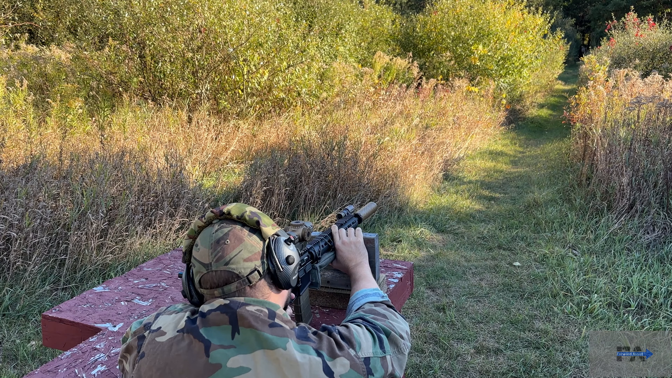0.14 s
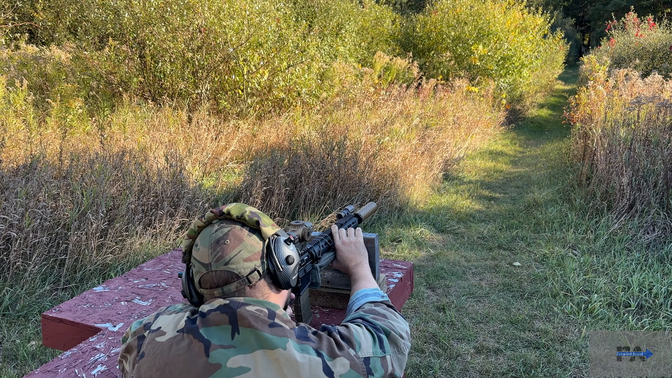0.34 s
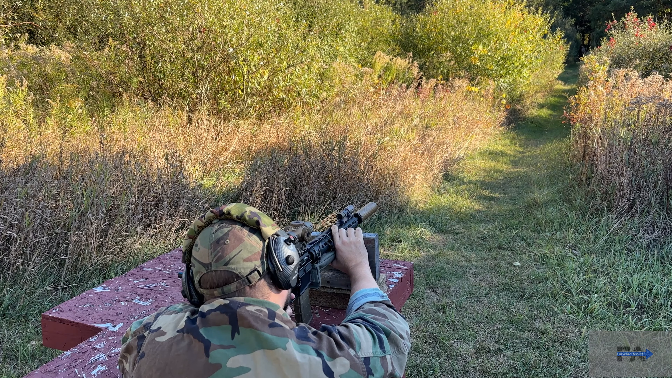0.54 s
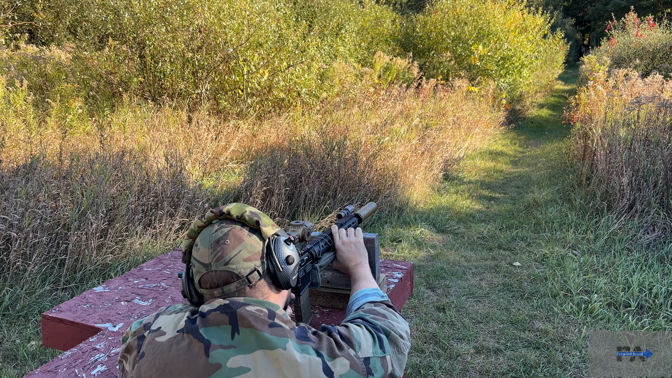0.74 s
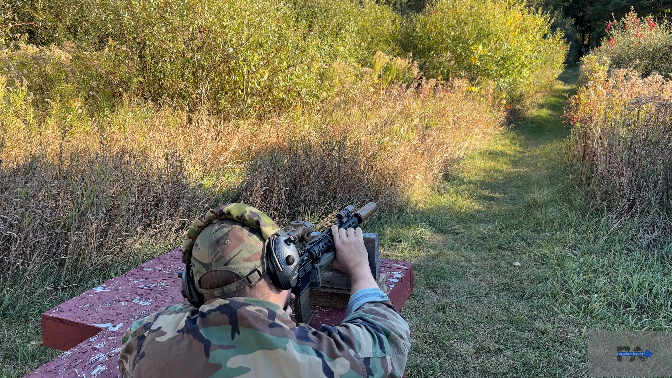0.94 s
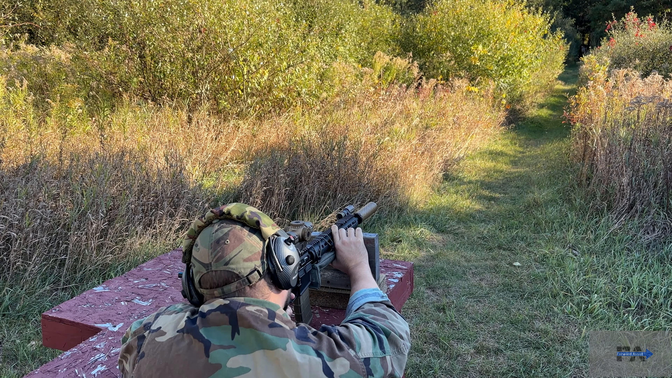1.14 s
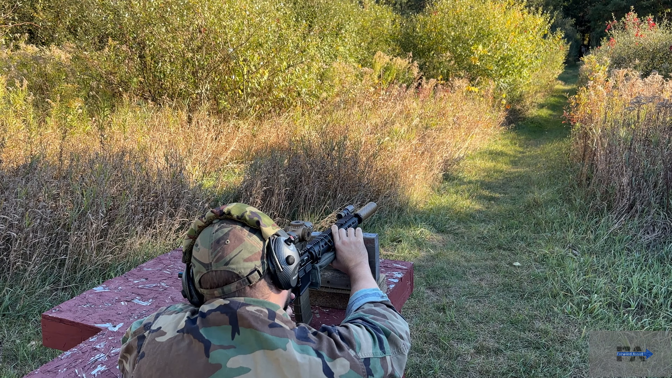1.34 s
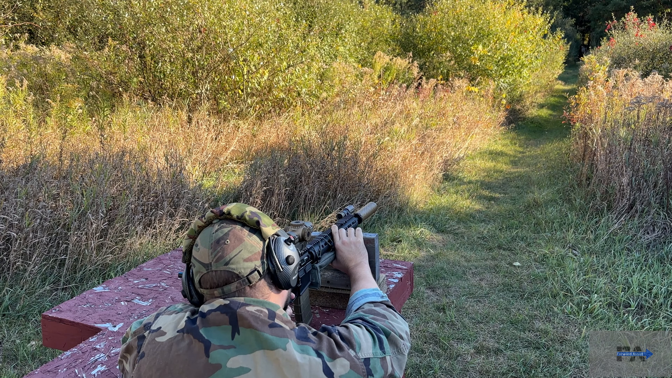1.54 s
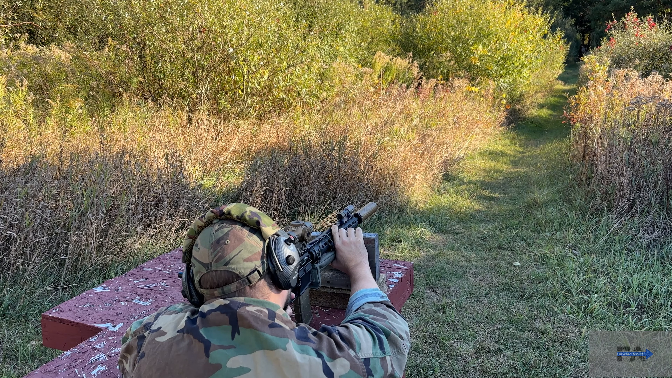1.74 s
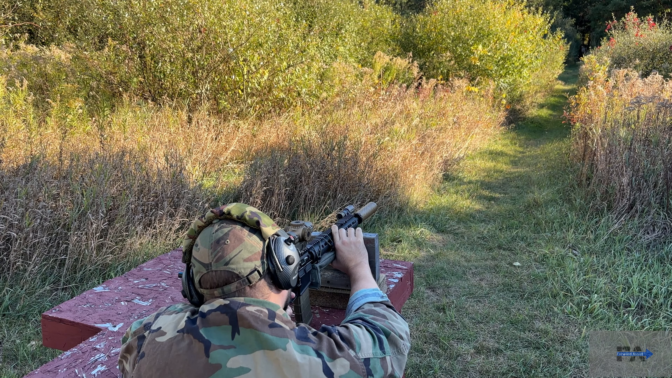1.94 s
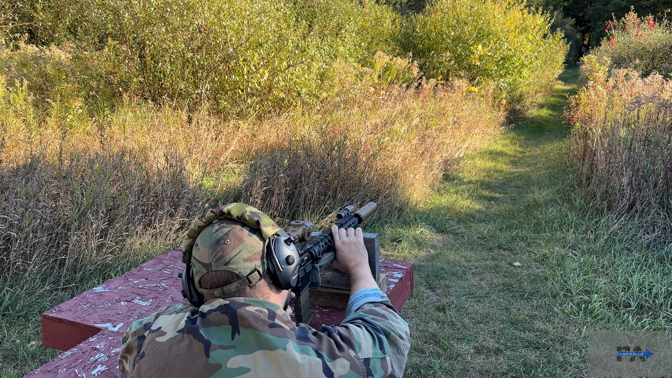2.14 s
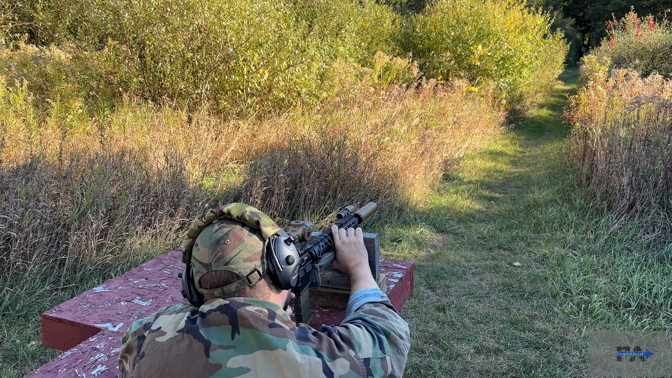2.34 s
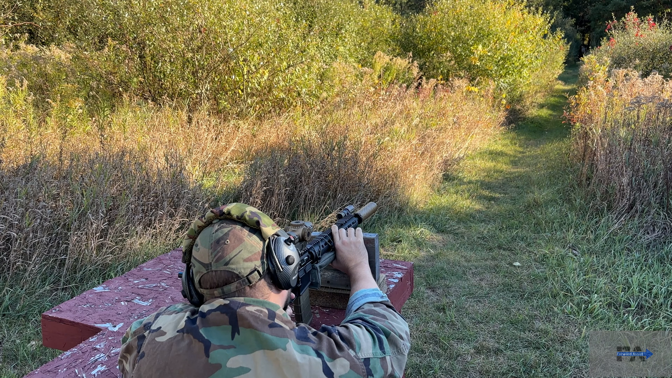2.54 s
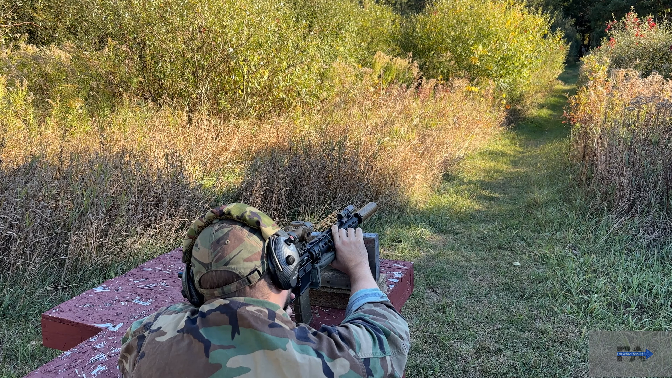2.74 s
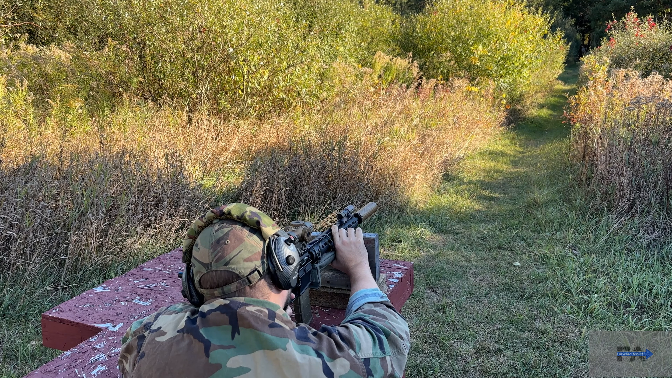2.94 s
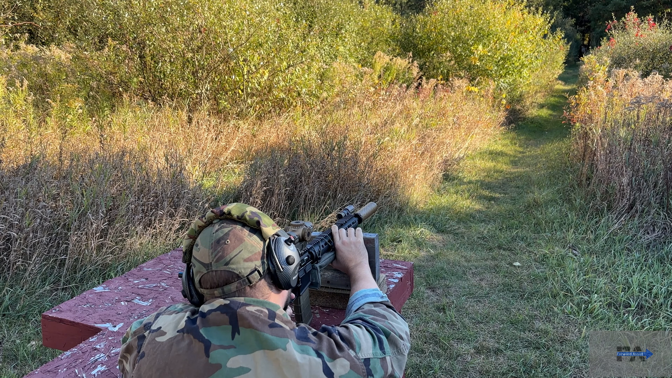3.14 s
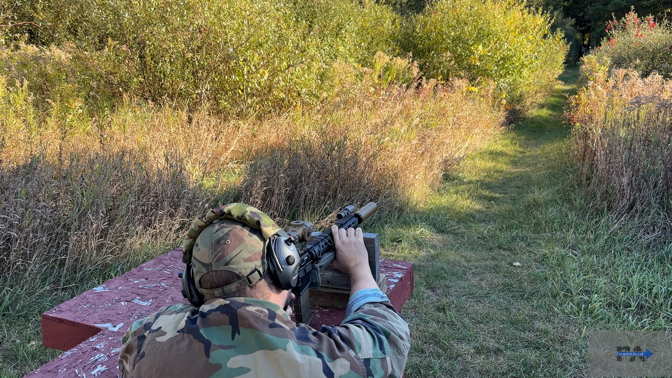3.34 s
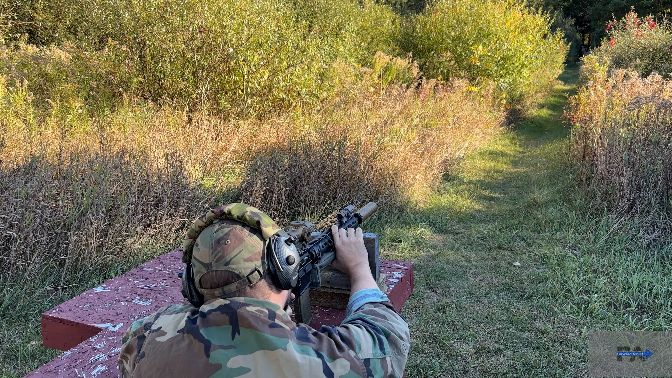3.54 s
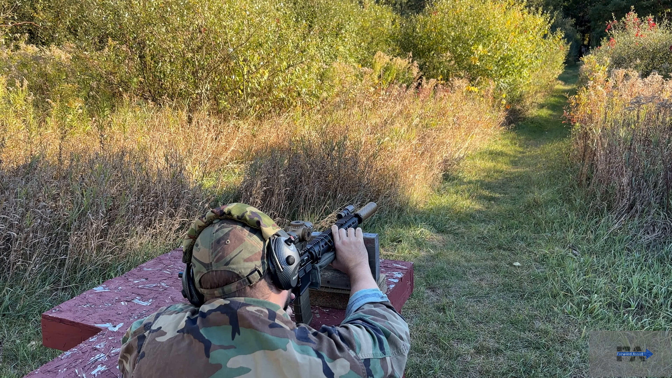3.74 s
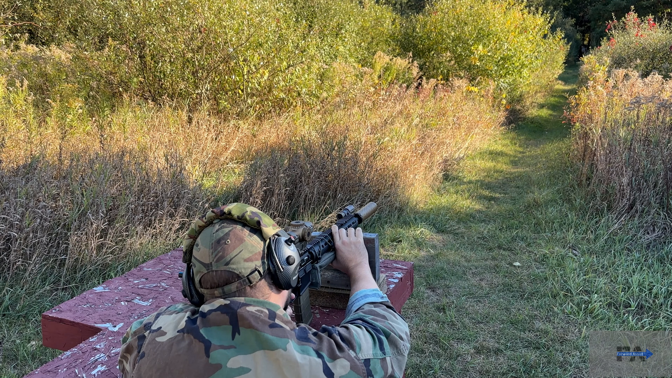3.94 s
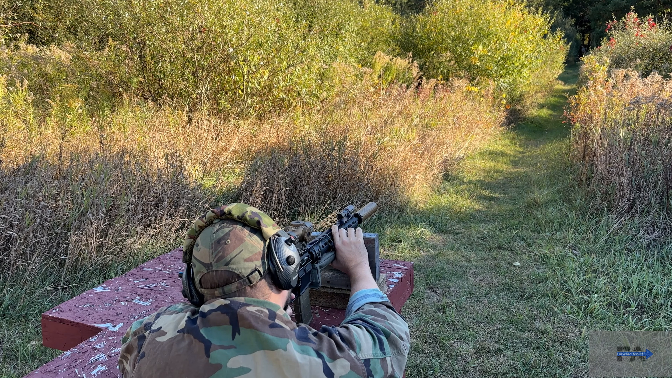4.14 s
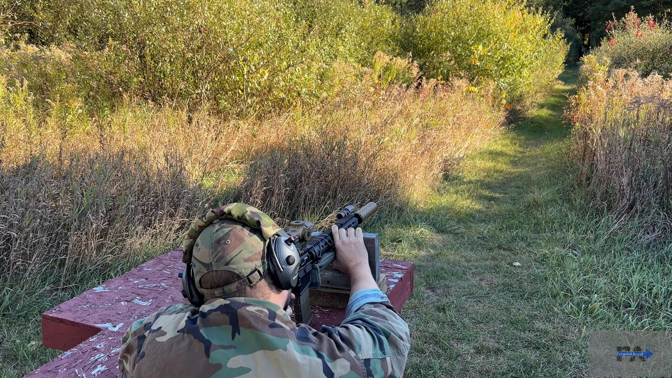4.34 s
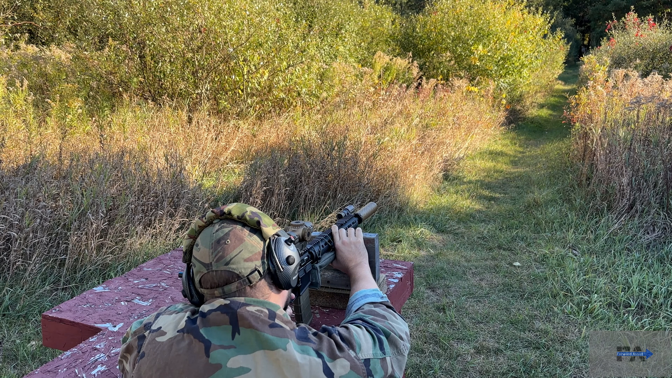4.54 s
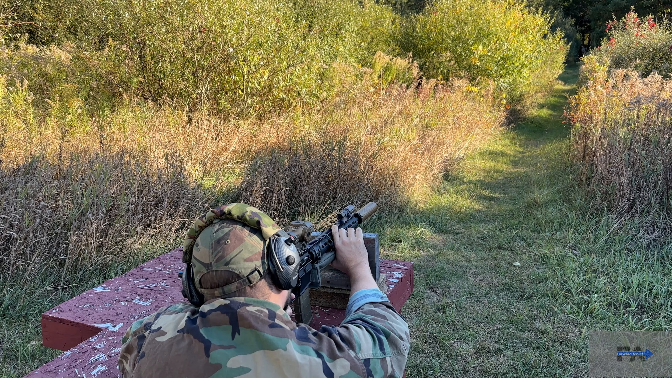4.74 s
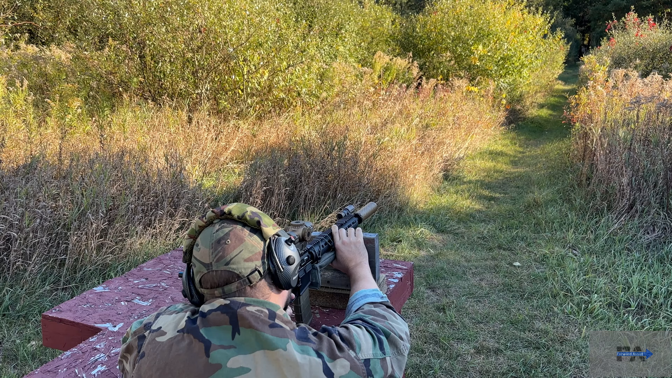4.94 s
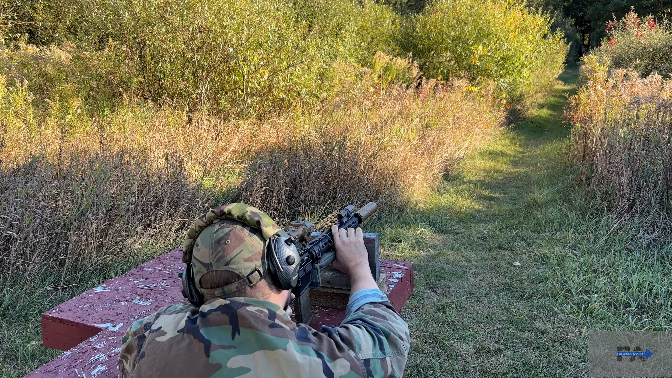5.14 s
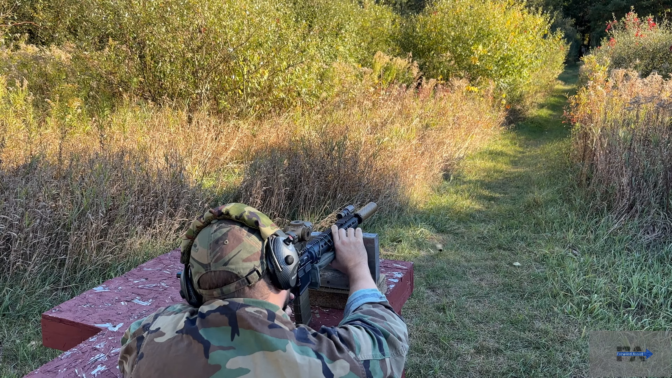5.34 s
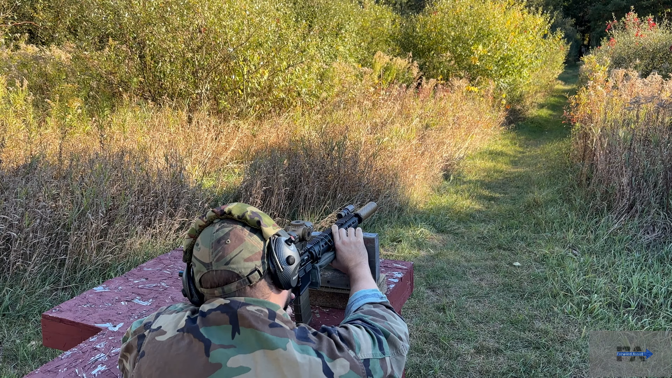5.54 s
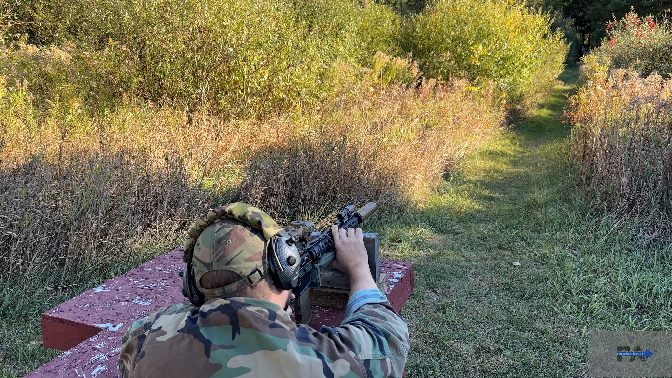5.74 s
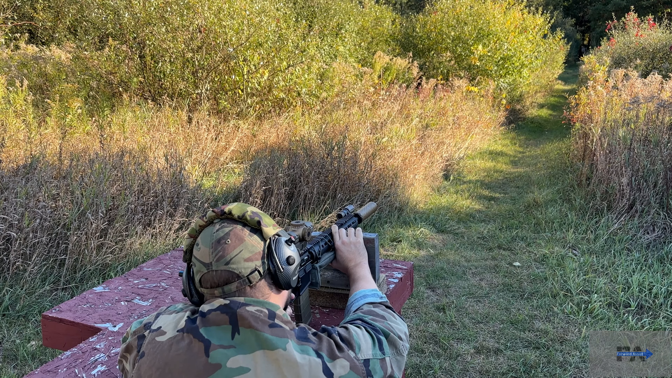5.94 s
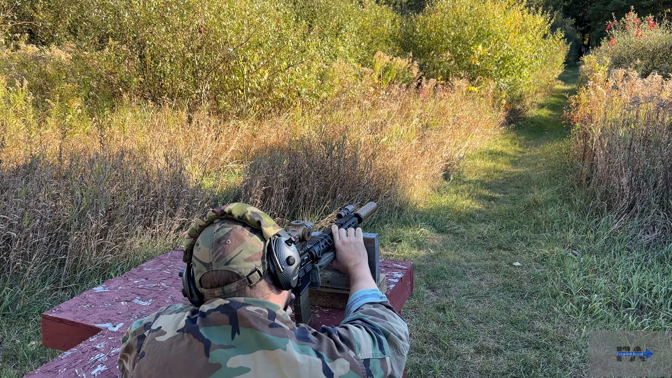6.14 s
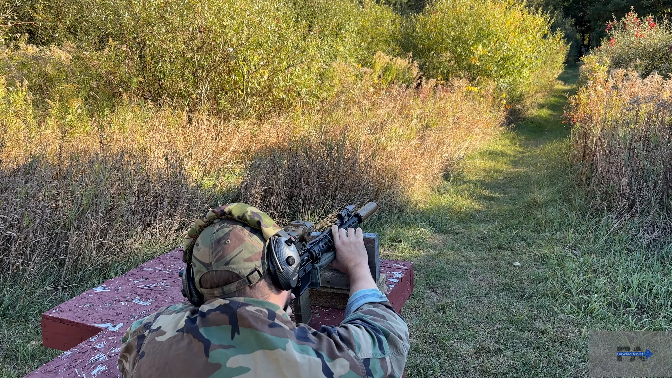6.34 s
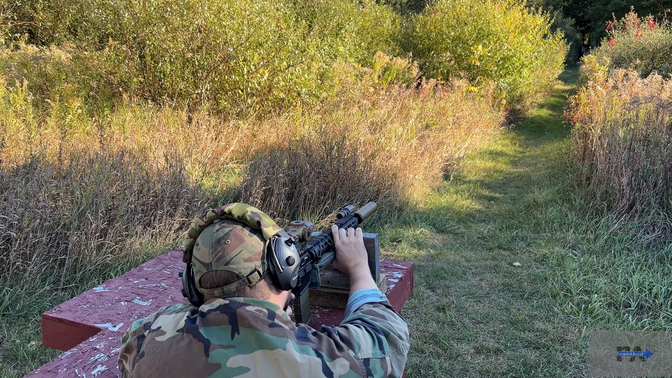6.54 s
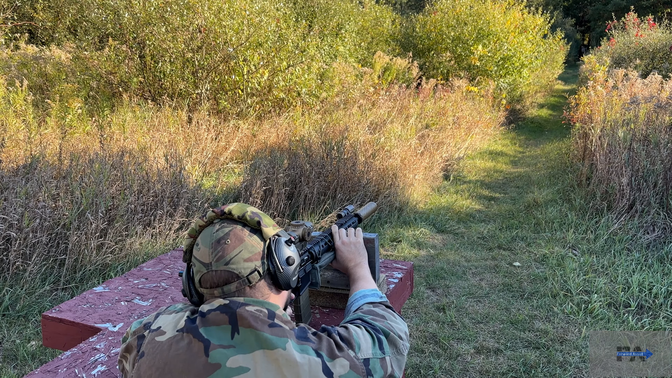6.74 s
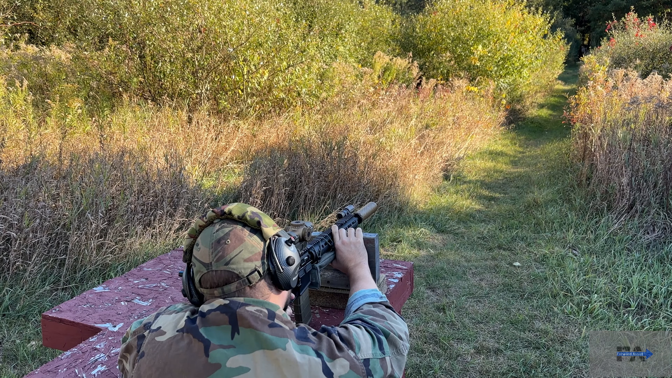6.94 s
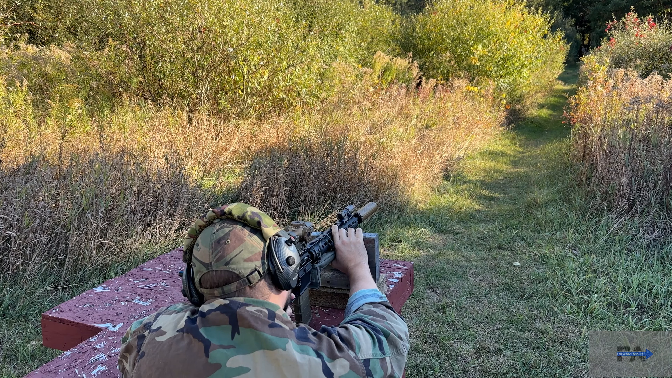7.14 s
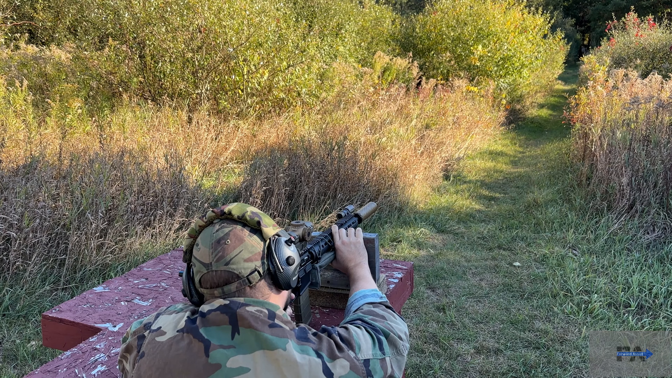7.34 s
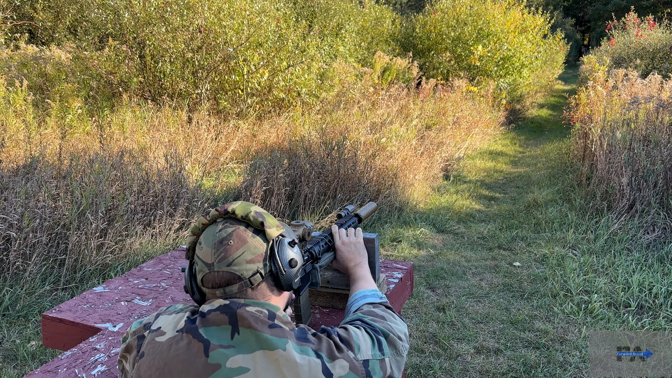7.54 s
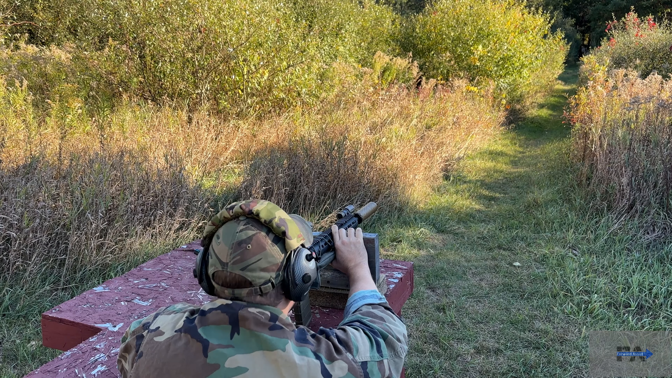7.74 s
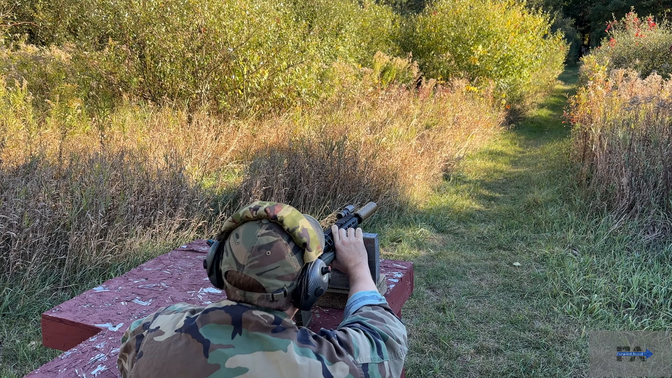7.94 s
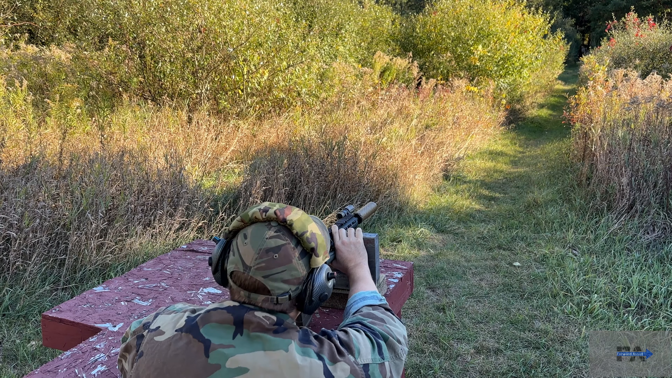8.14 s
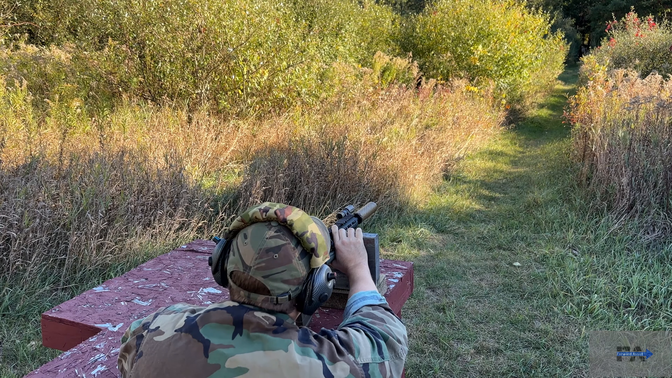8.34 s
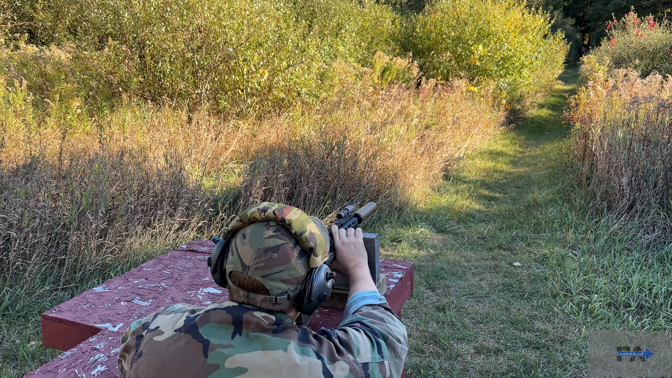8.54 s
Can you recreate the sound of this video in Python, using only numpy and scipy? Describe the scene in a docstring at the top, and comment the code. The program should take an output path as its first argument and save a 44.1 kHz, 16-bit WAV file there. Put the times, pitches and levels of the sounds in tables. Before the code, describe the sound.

The sound opens on the echo of an earlier rifle shot, dying away over about two seconds. Light wind bumps the microphone in low gusts, strongest between 2.7 and 3.8 seconds, over a faint countryside hum. Sparrows chirp far off now and then. At 1.8 seconds the rifle's steel action clicks softly, with a few tiny ticks around it. At about 5.3 seconds the suppressed rifle fires once, close by and much louder than anything else: a sharp crack with a low recoil thump on the bench. The crack scatters back from bushes and trees, swells briefly, then dulls and fades over two seconds. At 5.8 seconds a spent brass case lands with a short, bright ping. The wind eases, a faint metal click comes at 7.9 seconds, and a sleeve rustles very softly at the end.

```python
"""The echo of a rifle shot dies away in a scrubby lane while light wind buffets the microphone.
The steel action clicks and the suppressed rifle fires again: gas rings in the suppressor, the bullet
cracks, recoil thumps the bench. The crack rolls back from bushes and trees for two seconds and a
spent brass case lands, ringing. A sleeve rustles; sparrows chirp far off over the countryside's hum."""
import sys
import numpy as np
from scipy import signal
from scipy.fft import rfft, irfft, next_fast_len
from scipy.io import wavfile
from scipy.ndimage import uniform_filter1d, map_coordinates

SR = 44100
rng = np.random.default_rng(int(sys.argv[2]) if len(sys.argv) > 2 else 0)


def unload_audio(sound):
    """Save the sound as a 16-bit wav file, at the path given as the first command line argument."""
    columns = np.transpose(np.atleast_2d(sound))
    # keep every value between -1 and 1, then stretch to whole-number steps
    steps = np.round(np.clip(columns, -1, 1) * 32767)
    wavfile.write(sys.argv[1], SR, steps.astype(np.int16))


N = 378378


def amp(db):
    return 10 ** (np.asarray(db) / 20)


def unit_rms(x):
    return x / np.sqrt(np.mean(x ** 2) + 1e-20)


def at_hz(points, hz):
    """Interpolates (Hz, value) points on a log axis."""
    knot_hz, values = np.transpose(points)
    return np.interp(np.log(hz + 1), np.log(knot_hz + 1), values)


def wobble(knots_per_s):
    """Smooth random curve."""
    return map_coordinates(rng.standard_normal(2 ** 13), [np.arange(N) * knots_per_s / SR])


def filtered(x, response):
    """Applies a complex frequency response."""
    size = next_fast_len(x.shape[-1] + 8192)
    return irfft(rfft(x, size) * response(np.fft.rfftfreq(size, 1 / SR)), size)[..., :x.shape[-1]]


def resonances(modes):
    """Frequency response of a body's modes, alternating in sign."""
    return lambda f: sum((-1) ** k * amp(db) * 1j * f * width / (hz * hz - f * f + 1j * f * width)
                         for k, (hz, width, db) in enumerate(modes))


def patchy_noise(spectrum, correlation, patchy_db, shape_db=lambda hz, s: 0):
    """Stereo noise with random patches of gain over frequency and time."""
    def mid_side_response(f):
        angle = np.arccos(np.clip(at_hz(correlation, f), -1, 1)) / 2
        return amp(at_hz(spectrum, f)) * [np.cos(angle), np.sin(angle)]

    hz, s, bins = signal.stft(rng.standard_normal((2, N)), SR, nperseg=256)
    patches = uniform_filter1d(rng.standard_normal(bins.shape[1:]), 4, axis=0)
    patches = unit_rms(uniform_filter1d(patches, 6, axis=1))
    gain = amp(patchy_db * patches + shape_db(hz[:, None], s))
    pair = signal.istft(bins * gain, SR, nperseg=256)[1][:, :N]
    mid, side = filtered(pair, mid_side_response)
    return np.array([mid + side, mid - side]) / np.sqrt(np.mean(amp(at_hz(spectrum, hz)) ** 2))


def add(track, start_s, sound, pan_db=0):
    """Mixes a sound into a stereo track; positive pan is left."""
    part = track[:, round(start_s * SR):][:, :sound.shape[-1]]
    part += sound[..., :part.shape[1]] * amp([[pan_db / 2], [-pan_db / 2]])


def puff(hz, sigma_s, noise_share, phase_rad=0):
    """Gaussian burst of tone and band noise, centred 3 sigma after its start."""
    t = np.arange(-3 * sigma_s, 3 * sigma_s, 1 / SR)
    band = np.exp(-np.log((np.fft.rfftfreq(2 ** 13, 1 / SR) + 1) / hz) ** 2 / 0.32)
    mid, side = unit_rms(irfft(rfft(rng.standard_normal((2, 2 ** 13))) * band))
    hiss = .8 * mid + .5 * side * [[1], [-1]]
    bell = np.exp(-(t / sigma_s) ** 2 / 2) - np.exp(-9 / 2)
    tone = np.cos(2 * np.pi * hz * t + phase_rad * np.array([[-1], [1]]))
    return bell * ((1 - noise_share) * tone + noise_share * .5 * hiss[:, :len(t)])


# Hum envelope. Each row: time in seconds, level in dB.
HUM_LEVEL = [(0, -62), (4.5, -62.5), (6.5, -70.5), (8.58, -72)]
# Hum spectrum. Each row: frequency in Hz, relative density in dB.
HUM_SPECTRUM = [(88, -29.5), (150, -0.5), (190, -6), (275, -5.5), (871, -15), (2400, -33), (7180, -43.5),
                (9820, -52), (13200, -42), (16000, -60)]
# Hum stereo image. Each row: frequency in Hz, left-right correlation.
HUM_CORRELATION = [(60, 0.73), (180, -0.11), (550, 0.19), (1650, -0.28), (4970, 0.42), (15000, -0.21)]


def countryside_hum():
    """Low, wide, slowly wavering noise of the fields."""
    level_db = np.interp(np.arange(N) / SR, *np.transpose(HUM_LEVEL)) + .8 * wobble(3)
    return amp(level_db) * patchy_noise(HUM_SPECTRUM, HUM_CORRELATION, patchy_db=1.5)


# Wind envelope. Each row: time in seconds, level in dB.
WIND_LEVEL = [(0, -35), (.35, -57.5), (1, -58), (2.3, -56.5), (3.1, -53.5), (3.5, -42), (3.82, -40),
              (3.88, -64), (4.25, -50), (4.35, -63), (4.9, -60), (5.2, -43), (5.7, -58.5), (7.2, -64),
              (7.35, -73.5), (8.58, -67.5)]
# Wind rumble. Each row: frequency in Hz, relative density in dB.
WIND_SPECTRUM = [(12, -41.5), (20, -12.5), (54, 10), (123, -1), (206, -16.5), (400, -40), (520, -69),
                 (880, -120)]
# Strong eddies. Each row: centre in seconds, level in dB, pitch in Hz.
EDDIES = [(0.097, -28, 73.5), (0.207, -30, 71), (0.244, -27.5, 101), (0.55, -30.5, 86.3), (.932, -41.5, 83),
          (1.898, -44.5, 73.5), (2.555, -35, 60), (2.707, -24, 85.2), (3.243, -42, 71.7),
          (3.402, -27.5, 76.6), (3.606, -32.5, 79.4), (3.685, -23, 108), (3.754, -27, 67.4),
          (4.091, -41, 95), (4.21, -45, 79), (5.115, -37, 70.2), (5.49, -36, 122), (5.639, -39, 103.5),
          (6.168, -41, 87.4), (6.691, -43.5, 66), (6.948, -30, 73), (7.185, -47.5, 64.3),
          (7.245, -46, 92.4)]


def wind(small_count=40):
    """Wind flutters on the microphone in lumps; eddies thud on its ports."""
    knot_s, wind_db = np.transpose(WIND_LEVEL)
    lumps = amp(np.interp(np.arange(N) / SR, knot_s, wind_db) + 2.9 * wobble(14))
    rumble = filtered(rng.standard_normal((2, N)), lambda f: amp(at_hz(WIND_SPECTRUM, f)))
    mid, side = lumps * unit_rms(rumble)
    out = np.array([mid + 0.67 * side, mid - 0.25 * side])
    when, weakness, pitch = rng.random((small_count, 3)).T
    small_s = when * N / SR
    small_db = np.interp(small_s, knot_s, wind_db) + 9 - 8 * weakness
    small_hz = 76 * 1.25 ** (2 * pitch - 1)
    for s, db, hz in [*EDDIES, *zip(small_s, small_db, small_hz)]:
        sigma_s = 1.1 / hz
        start_s = s - 3 * sigma_s
        thud = puff(hz, sigma_s, noise_share=0.3, phase_rad=0.34 * rng.standard_normal())
        add(out, max(start_s, 0), amp(db) * thud)
        onset_db = db - 7.5 + 0.18 * (db + 29.5)  # strong eddies start brighter
        add(out, max(start_s - .012, 0), amp(onset_db) * puff(1.53 * hz, sigma_s, noise_share=0.93))
    return out


def bird_note(out, s, path, db, upper_db, fade_s, above_hz=550):
    """Adds a two-voiced note gliding along (seconds from s, Hz) points."""
    knot_s, knot_hz = np.transpose(path)
    t = np.arange(knot_s[0], knot_s[-1], 1 / SR)
    hz = uniform_filter1d(np.interp(t, knot_s, knot_hz), size=180, mode="nearest")
    swell = np.clip(np.minimum(t - knot_s[0], knot_s[-1] - t) / fade_s, 0, 1)
    lower = np.sin(2 * np.pi * np.cumsum(hz) / SR)
    upper = np.sin(2 * np.pi * np.cumsum(hz + above_hz) / SR)
    add(out, s + knot_s[0], amp(db) * swell * (lower + amp(upper_db) * upper))


# Peaked chirps. Each row: crest in seconds, length in seconds, crest pitch in Hz, level in dB.
CHIRPS = [(.616, .05, 7000, -76), (.976, .075, 3690, -60.5), (1.112, .06, 5550, -71.5),
          (1.23, .045, 3950, -68), (1.33, .06, 3700, -72.5), (2.6, .042, 3700, -76.5),
          (2.953, .05, 3800, -71), (3.232, .062, 3700, -66.5), (4.065, .058, 3800, -71.5),
          (4.31, .07, 3570, -82.5), (6.79, .048, 3790, -77.5), (8.117, .051, 3800, -76.5)]
# Longer calls. Each row: crest in seconds, level in dB, crest pitch in Hz.
WARBLES = [(.772, -71.5, 4200), (2.045, -58, 4290), (4.68, -64, 4250)]
# Main and low voice of a warble. Each row: seconds from the crest, ratio to crest pitch.
WARBLE_MAIN = [(-.055, .75), (-.005, 1), (.018, .85), (.03, .71), (.047, .93)]
WARBLE_LOW = [(-.04, .66), (-.026, .63), (-.006, .9), (.02, .8)]
# Near-level notes. Each row: centre in seconds, pitch in Hz, level in dB.
WHISTLES = [(3.52, 3050, -88.5), (3.73, 3130, -87), (3.92, 3120, -88.5), (4.179, 3145, -88),
            (5.075, 7200, -86)]


def sparrows(rise_hz_per_s=31000, fall_hz_per_s=27000, whistle_s=.115):
    """Chirps climb and drop, warbles dip and turn up again, whistles barely bend; all rasp a little."""
    out, rasp_db = np.zeros((2, N)), 4 * wobble(400)
    for s, length_s, hz, db in CHIRPS:
        rise_s, fall_s = 0.54 * length_s, 0.46 * length_s
        path = [(-rise_s, hz - rise_hz_per_s * rise_s), (0, hz), (fall_s, hz - fall_hz_per_s * fall_s)]
        bird_note(out, s, path, db, upper_db=-7.5, fade_s=0.37 * length_s)
    for s, db, hz in WARBLES:
        bird_note(out, s, np.multiply(WARBLE_MAIN, [1, hz]), db, upper_db=-14, fade_s=.02)
        bird_note(out, s, np.multiply(WARBLE_LOW, [1, hz]), db - 6, upper_db=-25, fade_s=.015)
    for s, hz, db in WHISTLES:
        path = [(-whistle_s / 2, 0.98 * hz), (0, hz), (whistle_s / 2, 0.94 * hz)]
        bird_note(out, s, path, db, upper_db=-3, fade_s=.025, above_hz=420)
    return out * amp(rasp_db)


# Cloth rustles. Each row: centre in seconds, Gaussian sigma in seconds, level in dB.
RUSTLES = [(0.197, 0.041, -77), (0.96, 0.037, -83), (6.19, 0.025, -78.5), (8.35, 0.26, -87.5)]


def sleeve():
    """Soft, bright swishes of cloth."""
    t = np.arange(N) / SR
    swish = sum(amp(db) * np.exp(-((t - s) / sigma_s) ** 2 / 2) for s, sigma_s, db in RUSTLES)
    flutter = amp(2.2 * wobble(60))
    spectrum = [(2000, -32), (6000, -6), (13000, 2), (16000, -11)]
    return swish * flutter * patchy_noise(spectrum, correlation=[(5000, .5)], patchy_db=3.4)


# Small ticks. Each row: time in seconds, level in dB, band centre in Hz.
TICKS = [(1.6881, -59, 1737), (1.7594, -62, 1610), (2.1121, -60, 3110), (2.1798, -55, 1590)]


def ticks():
    """Faint, noisy ticks near the bench."""
    out = np.zeros((2, N))
    for s, db, hz in TICKS:
        add(out, s - .002, amp(db) * puff(hz, sigma_s=.0015, noise_share=0.97))
    return out


# Decay in the nearby brush. Each row: frequency in Hz, T60 in seconds.
BRUSH_DECAY = [(300, .25), (3000, 0.18), (12000, 0.32)]


def brush_scatter(dry, split_s):
    """Short scatter off nearby leaves; sounds after split_s get a second random tail."""
    hz, t, bins = signal.stft(rng.standard_normal((2, 2, SR // 3)), SR, nperseg=256)
    decay = amp(-60 * t / at_hz(BRUSH_DECAY, hz)[:, None])
    tails = signal.istft(bins * decay, SR, nperseg=256)[1]
    late = np.arange(N) > split_s * SR
    wet = sum(signal.oaconvolve(dry * part, tail / np.linalg.norm(tail[0]), axes=1)
              for part, tail in zip([~late, late], tails))
    return np.pad(wet, ((0, 0), (400, 0)))[:, :N]  # 9 ms pre-delay


# Landing and bounce of the case. Each row: start in seconds, level in dB.
CASE_HITS = [(5.7739, -11), (5.7915, -27)]
# Brass modes. Each row: frequency in Hz, gain in dB, T60 in seconds.
BRASS_MODES = [(3007, 3.5, 0.0078), (4300, -4, .008), (6200, -2, 0.0038), (11440, -38, .13),
               (14220, -18, .008)]


def spent_case(attack_s=0.00049):
    """The brass snaps on the bench and one thin mode rings on."""
    out, t = np.zeros((2, N)), np.arange(SR // 4) / SR
    ring = sum(amp(db - 60 * t / t60) * np.sin(2 * np.pi * hz * t) for hz, db, t60 in BRASS_MODES)
    for s, db in CASE_HITS:
        add(out, s, amp(db) * ring * (1 - np.exp(-t / attack_s)))
    return out


# Clicks of the action. Each row: time in seconds, relative level in dB, pan in dB.
CLICKS = [(1.8136, -15, 1), (7.8804, -24, 3)]
# Steel modes. Each row: frequency in Hz, bandwidth in Hz, gain in dB.
STEEL_MODES = [(2820, 1600, 4), (3900, 730, 6), (5400, 600, -12.5), (8400, 650, -7), (12350, 3900, -3)]
# Stock modes. Each row: frequency in Hz, bandwidth in Hz, relative gain in dB.
STOCK_MODES = [(230, 40, -6.5), (540, 380, 4)]


def action_clicks(t60_s=0.02, attack_s=.001):
    """A few ms of rattling contact drive the resonances of the steel and the stock."""
    out, t = np.zeros((2, N)), np.arange(SR // 10) / SR
    for s, db, pan_db in CLICKS:
        rattle = rng.standard_normal(len(t)) * amp(-60 * t / t60_s) * (1 - np.exp(-t / attack_s))
        steel = 1.1 * rattle + filtered(rattle, resonances(STEEL_MODES))
        stock = amp(10) * filtered(rattle, resonances(STOCK_MODES))
        add(out, s - .001, amp(db - 7.5) * (steel + stock), pan_db)
    return out


SHOT_S, SHOT_GAP_S, AIR_LOSS_DB_PER_S = 5.256, 5.994, 51
# Echo envelope. Each row: time in seconds, relative brush level in dB, relative far wood level in dB.
ECHO_LEVEL = [(5.256, -120, -120), (5.262, -43.5, -41.5), (5.28, -34, -44.5), (5.329, -38.5, -55),
              (5.421, -45, -61), (5.469, -38, -59.5), (5.6, -35, -43.5), (5.76, -35.5, -37.5),
              (5.87, -40, -42.5), (6.03, -50.5, -49), (6.7, -72, -69), (7.15, -79.5, -69),
              (7.4, -84, -73.5), (8.399, -100, -100.5)]
# Echo spectrum. Each row: frequency in Hz, relative density in dB.
ECHO_SPECTRUM = [(150, -49.5), (300, -17), (450, -4.5), (1300, -6), (6500, -4.5), (9000, -6),
                 (12500, -12.5), (16000, -15)]
# Echo stereo image. Each row: frequency in Hz, left-right correlation.
ECHO_CORRELATION = [(60, 0.61), (180, 0.6), (550, .5), (1650, 0.16), (4970, 1), (15000, .6)]
# Slaps off single bushes, trunks and banks. Each row: time in seconds, relative level in dB, band in Hz.
SLAPS = [(1.587, -44.5, 616), (5.316, -11, 5280), (5.431, -23.5, 1200), (5.461, -23, 1850),
         (5.469, -19, 1900), (5.506, -21, 754), (5.598, -25, 606), (5.677, -19, 950), (5.683, -14, 1780),
         (5.699, -19, 2600), (5.738, -17, 1800), (5.744, -17, 1470), (5.754, -16.5, 1660),
         (7.618, -54, 557)]


def lane_echo(small_count=40, small_span_s=.55):
    """Leaves scatter the crack back, duller with distance; the far wood rolls on in the low mids."""
    knot_s, brush_db, wood_db = np.transpose(ECHO_LEVEL)

    def shape_db(hz, t):
        earlier = t < 3  # the opening is the louder tail of the shot before
        t = t + earlier * SHOT_GAP_S
        treble_db = np.clip(7 - AIR_LOSS_DB_PER_S * (t - SHOT_S), -45, 7)  # 6.5 kHz against 2 kHz
        tilt_db = treble_db * (np.maximum(hz, 1400) - 2000) / 4500
        brush = np.interp(t, knot_s, brush_db) + earlier * 5.6 + tilt_db
        wood = np.interp(t, knot_s, wood_db) + earlier * 14.6 - 40 * np.log((hz + 1) / 620) ** 2
        return 10 * np.log10(amp(2 * brush + 11) + amp(2 * wood + 20.5))  # power sum

    out = patchy_noise(ECHO_SPECTRUM, ECHO_CORRELATION, patchy_db=2, shape_db=shape_db)
    when, weakness, pitch = rng.random((small_count, 3)).T
    small_s = SHOT_S + .15 + small_span_s * when
    small_db = np.interp(small_s, knot_s, brush_db) + 10.5 - 6 * weakness
    small_hz = 1387 * 1.9 ** (2 * pitch - 1)
    for s, db, hz in [*SLAPS, *zip(small_s, small_db, small_hz)]:
        add(out, s - .002, amp(db + 0.5) * puff(hz, sigma_s=.0009 + .7 / hz, noise_share=0.87))
    return out


# Muzzle blast. Each row: centre in seconds, pitch in Hz, Gaussian sigma in seconds, level in dB,
# pan in dB, noise share from 0 to 1.
BLAST = [(5.2572, 750, 0.0013, -6, 4.5, 0.15), (5.258, 1095, 0.0031, -13, 1.5, 0.94),
         (5.2605, 1900, 0.0011, -7.5, -5, 0.5), (5.259, 4000, .003, -14.5, -1, 1),
         (5.260, 12500, 0.0013, -11, -2.5, 1), (5.257, 423.6, 0.0045, -16.5, 2.5, 1)]
# Bench modes. Each row: frequency in Hz, level in dB, T60 in seconds.
BENCH_MODES = [(250, -14.5, 0.058), (60, -16, 0.14), (520, -14, .02), (134.1, -25, 0.18)]


def rifle_shot(recoil_s=5.2721, recoil_rise_s=.0006):
    """Gas rings in the suppressor, the crack follows, the recoil thumps the bench."""
    out, t = np.zeros((2, N)), np.arange(SR // 4) / SR
    for s, hz, sigma_s, db, pan_db, noise_share in BLAST:
        add(out, s - 3 * sigma_s, amp(db) * puff(hz, sigma_s, noise_share, phase_rad=0.2), pan_db)
    attack = 1 - np.exp(-t / recoil_rise_s)
    for k, (hz, db, t60) in enumerate(BENCH_MODES):
        side = (-1) ** k
        ring = np.cos(2 * np.pi * hz * t + side * np.array([[-0.21], [0.21]]))
        add(out, recoil_s, amp(db - 60 * t / t60) * attack * ring, pan_db=-3 * side)
    return out


def scene():
    """Sums all sources; clicks, ticks and birds also scatter off the brush."""
    near, birds = action_clicks() + ticks(), sparrows()
    rifle = rifle_shot() + lane_echo() + spent_case()
    scatter = brush_scatter(amp(-17) * near + amp(-3.5) * birds, split_s=2.4)
    return rifle + near + birds + scatter + sleeve() + wind() + countryside_hum()


# Phase between the microphone ports. Each row: frequency in Hz, left lead in radians.
PORT_PHASE = [(7400, 0), (11700, -5), (15500, -9.5)]


def record(dry, ceiling=.95, top_hz=16300):
    """Band-limited microphone pair: peaks round off, the ports notch 9.9 kHz and part in treble phase."""
    def response(hz):
        notch_db = -30 * np.exp(-((hz - 9900) / 450) ** 2)
        shelf_db = -19 / (1 + np.exp((15300 - hz) / 100))
        phase = np.exp(1j * at_hz(PORT_PHASE, hz) * [[.5], [-.5]])
        return amp(notch_db + shelf_db) * phase * (hz < top_hz)

    rounded = dry / (1 + np.abs(dry / ceiling) ** 6) ** (1 / 6)
    return filtered(rounded, response)


dry = scene()
out = record(dry)
unload_audio(out)
```